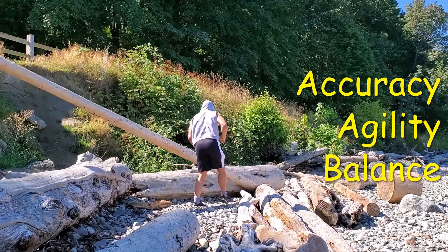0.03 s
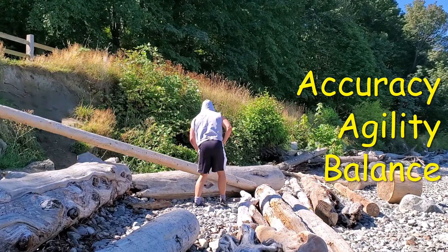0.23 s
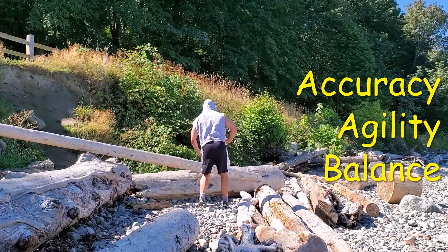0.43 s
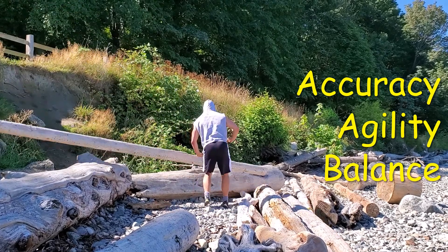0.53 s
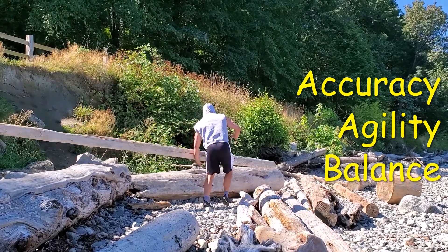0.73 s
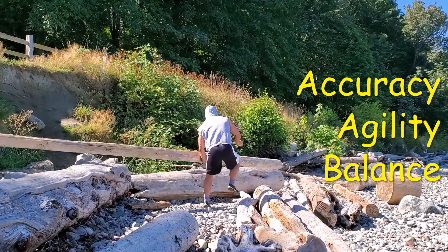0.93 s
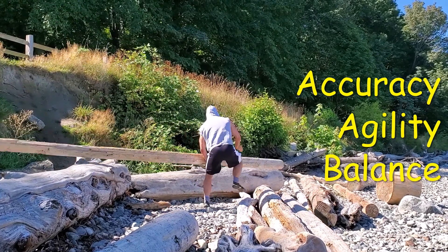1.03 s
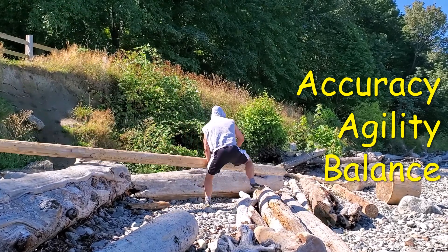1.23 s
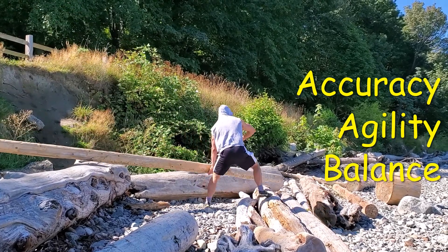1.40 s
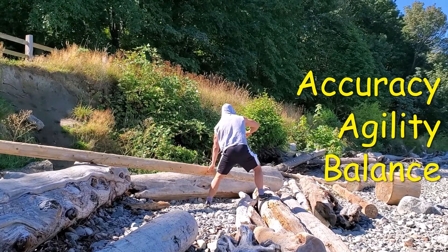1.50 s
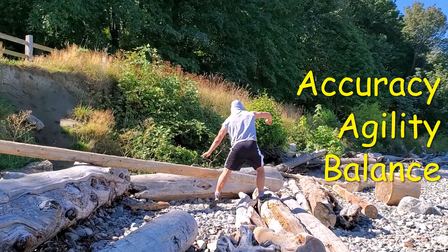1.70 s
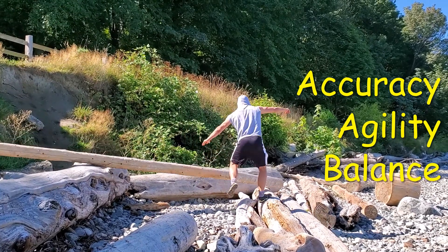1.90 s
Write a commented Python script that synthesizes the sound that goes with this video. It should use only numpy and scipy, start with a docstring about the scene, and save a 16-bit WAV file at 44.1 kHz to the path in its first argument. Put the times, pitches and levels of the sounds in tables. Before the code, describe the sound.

Heavy log drops and judders on a pebble beach, followed by crunching steps in light wind.

```python
"""Light wind rumbles on the microphone over a faint wash of water. A long, heavy log drops onto
driftwood on a pebble beach, judders and comes to rest: each blow rings its modes and rattles the pile.
Feet shift, then step hard, thumping the ground; the pebbles clack and grind as they collide.
At the end wood scrapes briefly on wood in a run of tiny slips."""
import sys
import numpy as np
from scipy import signal
from scipy.fft import rfft, irfft, next_fast_len
from scipy.io import wavfile
from scipy.ndimage import uniform_filter1d

SR = 44100
rng = np.random.default_rng(int(sys.argv[2]) if len(sys.argv) > 2 else 0)


def wav_record(signal):
    """Record a signal, one row per channel, as 16-bit PCM in the file named by sys.argv[1]."""
    frames = np.transpose(np.atleast_2d(signal))
    bounded = np.clip(frames, -1, 1)
    # unit amplitude maps onto the largest positive 16-bit level
    quanta = np.round(bounded * 32767).astype(np.int16)
    wavfile.write(sys.argv[1], SR, quanta)


N = 85995
T = np.arange(N) / SR

# Spectrum of colliding pebbles. Each row: frequency in Hz, gain in dB.
PEBBLE_SPECTRUM = [(250, -28), (800, -10), (1400, -13.5), (1880, 1), (2750, 0), (3300, -11.5),
                   (3900, -18.5), (4800, -12), (5450, -3.5), (6700, -16.5), (9600, -22.5), (11500, -56.5)]
# Grinding under load. Each row: time in seconds, level in dB.
GRIND_LEVEL = [(0, -53.5), (0.2, -50.5), (0.245, -38), (0.43, -53), (0.52, -48), (0.56, -41.5),
               (0.65, -38.5), (0.72, -45), (0.83, -47.5), (1.13, -44.5), (1.18, -53.5), (1.5, -46.5),
               (1.535, -25.5), (1.64, -32), (1.73, -43), (1.95, -43)]


def amp(db):
    """Decibels to gain."""
    return 10 ** (np.asarray(db) / 20)


def unit(x):
    """Scale to rms 1."""
    return x / np.sqrt(np.mean(x ** 2) + 1e-20)


def curve(rows):
    """Join (seconds, value) points by straight lines."""
    return np.interp(T, *np.transpose(rows))


def colour(x, spectrum):
    """Minimum-phase filter with the given (Hz, dB) response."""
    size = 2 * next_fast_len(N)
    hz, db = np.transpose(spectrum)
    grid_hz = np.maximum(np.arange(size // 2 + 1) * SR / size, 1)
    gain = amp(np.interp(np.log(grid_hz), np.log(hz), db))
    cepstrum = irfft(np.log(gain))
    cepstrum[1:size // 2] *= 2
    cepstrum[size // 2 + 1:] = 0
    return irfft(rfft(x, size) * np.exp(rfft(cepstrum)))[..., :N]


def spread(pair):
    """Mid and side to left and right: alike in the bass, wide in the treble."""
    # Each row: frequency in Hz, side gain in dB.
    width = [(50, -20.5), (250, -3)]
    side = colour(pair[1], width)
    return np.array([pair[0] + side, pair[0] - side])


def noise(spectrum):
    """Coloured stereo noise, rms 1."""
    return unit(colour(spread(rng.standard_normal((2, N))), spectrum))


def treble(x, above_hz=4300):
    """The part above the stones' main ring."""
    return signal.sosfiltfilt(signal.butter(2, above_hz, "high", fs=SR, output="sos"), x)


def fall(start_s, decay_s, rise_s):
    """Quick rise, exponential decay."""
    age_s = np.maximum(T - start_s, 0)
    return (1 - np.exp(-(age_s / rise_s) ** 2)) * np.exp(-np.minimum(age_s / decay_s, 60))


def ring(x, hz, t60_s):
    """Resonator: a unit click starts a decaying sine of height 1."""
    radius = np.exp(-np.log(1000) / (t60_s * SR))
    angle = 2 * np.pi * hz / SR
    return signal.lfilter([0, np.sin(angle)], [1, -2 * radius * np.cos(angle), radius ** 2], x + 1e-18)


def push(start_s, contact_ms):
    """Half-sine contact force of unit area."""
    force = np.sin(np.pi * np.clip((T - start_s) * 1000 / contact_ms, 0, 1))
    return force / force.sum()


def wind():
    """Light gusts rumble on the microphone."""
    # Each row: frequency in Hz, gain in dB.
    rumble_spectrum = [(25, 4), (85, -1), (130, -13.5), (250, -25.5), (600, -73.5)]
    # Each row: time in seconds, level in dB.
    gusts = [(0.17, -31.5), (0.42, -27.5), (0.72, -43), (0.88, -35), (1.3, -39), (1.65, -30)]
    return amp(curve(gusts)) * noise(rumble_spectrum)


def water():
    """Far water swells and ebbs."""
    # Each row: frequency in Hz, gain in dB.
    wash_spectrum = [(300, 3), (600, 0), (1300, -1), (2000, -13), (3700, -18), (5600, -7.5), (7000, -16.5),
                     (16000, -46.5)]
    # Each row: time in seconds, level in dB.
    swells = [(0.3, -49.5), (0.46, -53), (0.6, -50), (0.97, -48), (1.2, -51), (1.85, -49)]
    return amp(curve(swells)) * noise(wash_spectrum)


def log(scatter_db=2):
    """Each blow rings the log's modes; hard, short blows rattle the pile beneath most."""
    # Landing, judder, later nudges. Each row: start in seconds, level in dB, contact time in ms.
    blows = [(0.2090, -17.5, 2.9), (0.2148, -12, 3.02), (0.2285, -13.5, 2.44), (0.2454, -23, 7.5),
             (0.26, -9, 8.3), (0.296, -12, 5.9), (0.3238, -24, 9.7), (0.344, -19, 7.7), (1.398, -45, 0.93),
             (1.497, -31, 1.27), (1.621, -32, 1.63), (1.736, -48, 0.74)]
    # Each row: frequency in Hz, gain in dB, t60 in seconds.
    modes = [(33.84, -1, 0.4), (64.4, 0, 0.23), (78.3, 4, 0.094), (117.6, -8.5, 0.083), (187, -5.5, 0.067),
             (239.6, -2.5, 0.11), (328, -17.5, 0.081), (393, -18, 0.12), (506, -1.5, 0.13), (848, 0.5, 0.1)]
    # Driftwood rattle. Each row: frequency in Hz, gain in dB.
    pile_spectrum = [(170, 1.5), (420, -4.5), (650, -19), (2600, -27), (12000, -63.5)]
    forces = np.array([amp(db) * push(s, ms) for s, db, ms in blows])
    coupling = amp(scatter_db * rng.standard_normal((len(blows), len(modes))))
    body = sum(amp(db) * ring(coupling[:, k] @ forces, hz, t60) for k, (hz, db, t60) in enumerate(modes))
    rattle = sum(amp(db) * (2 / ms) ** 2 * fall(s, decay_s=0.028, rise_s=0.00038) for s, db, ms in blows)
    return body + amp(-5) * rattle * noise(pile_spectrum)


def clacks(rise_s=0.0016, ring_decay_s=0.0035, neighbour_ratio=1.13, neighbour_db=-11):
    """Each knock is a brief crack and the short ring of two stones; smaller stones crack brighter."""
    # Each row: start in seconds, level in dB, crack decay in ms, ring pitch in Hz.
    knocks = [(0.222, -20, 3.7, 2690), (0.227, -12.5, 1.66, 2815), (0.2877, -31.5, 8.4, 5580),
              (0.462, -35.5, 7.3, 2685), (0.5066, -32, 5.1, 2860), (0.5369, -32, 7.5, 2470),
              (0.551, -39, 35, 5430), (0.628, -25.5, 5.2, 1830), (0.74, -37.5, 16.6, 2735),
              (0.793, -26, 4.3, 2640), (1.003, -30, 8, 3034), (1.020, -33, 4.5, 5350),
              (1.075, -25.5, 2.8, 1965), (1.097, -32, 5.7, 2500), (1.131, -27, 3.1, 2200),
              (1.218, -32, 8.3, 1800), (1.316, -41.5, 9.4, 2130), (1.517, -18, 2.2, 1884),
              (1.589, -9.5, 3.4, 2545), (1.61, -18.5, 16, 2160), (1.6292, -13, 4.4, 2005),
              (1.6344, -11.5, 2.37, 5307), (1.678, -18, 3.2, 2776), (1.686, -9, 1.07, 2550),
              (1.733, -25.5, 2.5, 2700), (1.8066, -27, 4.2, 1990), (1.83, -27, 9.5, 1840),
              (1.874, -22, 2.05, 2455)]
    crack = noise(PEBBLE_SPECTRUM)
    crack /= np.sqrt(uniform_filter1d(np.mean(crack ** 2, axis=0), size=130))  # flatten the envelope
    top = treble(crack)
    median_hz = np.median([hz for *_, hz in knocks])
    out = 0
    for s, db, ms, hz in knocks:
        brightness = min((hz / median_hz) ** 6, 2)
        burst = (crack + (brightness - 1) * top) * fall(s, ms / 1000, rise_s)
        phase = 2 * np.pi * hz * (T - s)
        neighbour = np.sin(neighbour_ratio * phase + rng.uniform(0, 2 * np.pi, (2, 1)))
        stones = np.sin(phase) + amp(neighbour_db) * neighbour
        out += amp(db) * (burst + fall(s, ring_decay_s, rise_s) * stones)
    return out


def grinding(peak_hits_per_s=4500, spread_db=1.5, t60_cycles=42):
    """Dense tiny collisions, each ringing briefly at the pitch of its stone."""
    level_db = curve(GRIND_LEVEL)
    strengths = amp(spread_db * np.minimum(rng.exponential(1, (2, N)), 4)) * rng.choice([-1, 1], (2, N))
    density = np.sqrt(amp(level_db - level_db.max()))  # under a light load single stones stand out
    hits = strengths / np.sqrt(density) * (rng.random((2, N)) < density * peak_hits_per_s / SR)
    pitches_hz = np.geomspace(700, 14000, 36)
    stone = rng.integers(0, len(pitches_hz), N)
    # Higher-pitched grains ring louder, keeping the grinding bright.
    grains = sum(hz * ring(hits * (stone == k), hz, t60_cycles / hz) for k, hz in enumerate(pitches_hz))
    return amp(level_db) * unit(colour(spread(grains), PEBBLE_SPECTRUM))


def pebbles(dull_above_db=-39):
    """Knocks and grinding, duller while the foot bears down."""
    stones = clacks() + grinding()
    treble_cut_db = np.maximum(curve(GRIND_LEVEL) - dull_above_db, 0)
    return stones + treble(stones) * (amp(-treble_cut_db) - 1)


def footfalls():
    """Each foot thumps the ground and its sole gives a dull scuff."""
    # Each row: start in seconds, level in dB, thump pitch in Hz.
    steps = [(0.998, -18, 41.6), (1.044, -19.5, 47.2), (1.085, -20.5, 53.7), (1.418, -19.5, 86),
             (1.445, -16.5, 63.4), (1.485, -16.5, 43), (1.516, -8, 88.3), (1.553, -9.5, 52),
             (1.62, -15.5, 79.7)]
    # Each row: frequency in Hz, gain in dB.
    scuff_spectrum = [(140, 6), (280, -14.5), (520, -12.5), (2500, -79)]
    thumps = sum(amp(db) * ring(push(s, contact_ms=6.6), hz, t60_s=0.19) for s, db, hz in steps)
    scuffs = sum(amp(db) * fall(s, decay_s=0.013, rise_s=0.002) for s, db, _ in steps)
    return thumps + amp(-13) * scuffs * noise(scuff_spectrum)


def wood_scrape(start_s=1.903, rise_s=0.005, decay_s=0.042, slips_per_s=4800):
    """Uneven slips of wood on wood excite a few hollow resonances."""
    # Each row: frequency in Hz, gain in dB, t60 in seconds.
    modes = [(450, -12.5, 0.14), (932, 1.5, 0.064), (1235, 7.5, 0.014), (1930, 18.5, 0.005),
             (2550, -9, 0.026)]
    slips = spread(rng.standard_normal((2, N)) * (rng.random(N) < slips_per_s / SR))
    soft_slips = slips - treble(slips)
    wood = unit(sum(amp(db) * ring(soft_slips, hz, t60) for hz, db, t60 in modes))
    attack = np.clip((T - start_s) / rise_s, 0, 1)
    release = np.exp(-np.maximum(T - start_s - rise_s, 0) / decay_s)
    return amp(-27.5) * attack * release * wood


def echoes(x):
    """Short diffuse scatter from the logs and the bank, different in each ear."""
    tail = rng.standard_normal((2, N)) * fall(start_s=0.0032, decay_s=0.019, rise_s=0.00047)
    return amp(-9) * signal.fftconvolve(x, unit(tail) / np.sqrt(N), axes=1)[:, :N]


def scene():
    """Log, feet, stones and scrape over wind and water; only stones and scrape echo."""
    bright = pebbles() + wood_scrape()
    return wind() + water() + log() + footfalls() + bright + echoes(bright)


def record(dry, right_lag_s=0.00002, right_phase_rad=0.45, low_cut_hz=20, stopband_hz=16700):
    """The microphone's right port lags; the deepest bass and the top are cut."""
    hz = np.arange(N + 1) * SR / (2 * N)
    lag_rad = 2 * np.pi * hz * right_lag_s + right_phase_rad
    right = irfft(rfft(dry[1], 2 * N) * np.exp(-1j * lag_rad))[:N]
    heard = signal.sosfilt(signal.butter(2, low_cut_hz, "high", fs=SR, output="sos"), [dry[0], right])
    return signal.sosfilt(signal.cheby2(12, 70, stopband_hz, fs=SR, output="sos"), heard)


dry = scene()
out = record(dry)
wav_record(out)
```